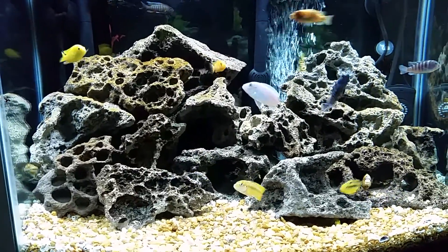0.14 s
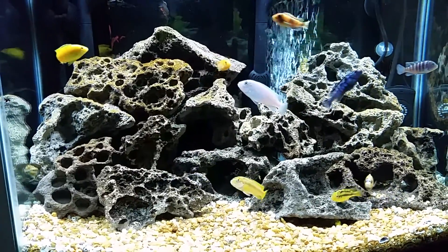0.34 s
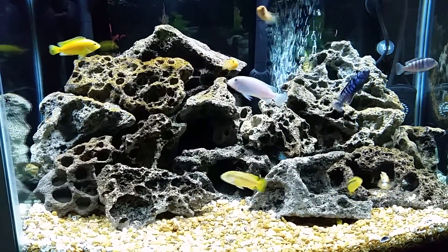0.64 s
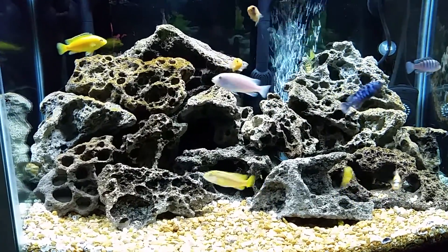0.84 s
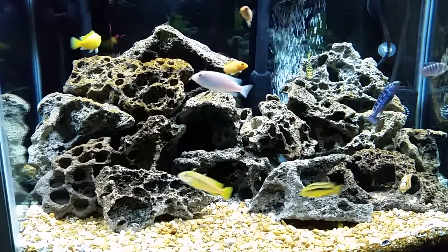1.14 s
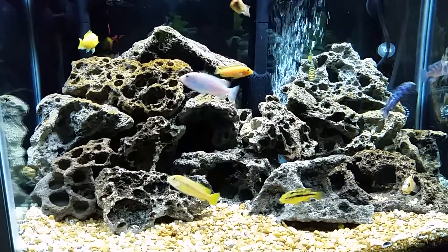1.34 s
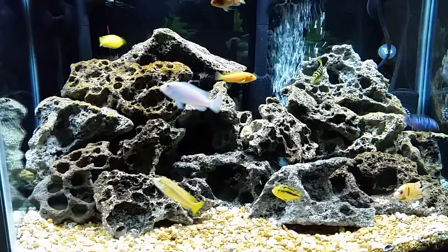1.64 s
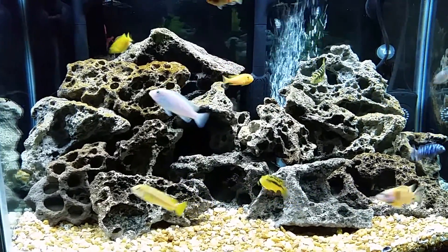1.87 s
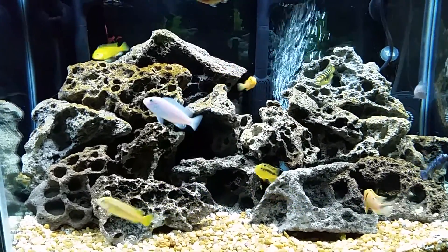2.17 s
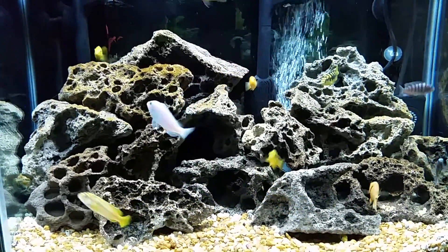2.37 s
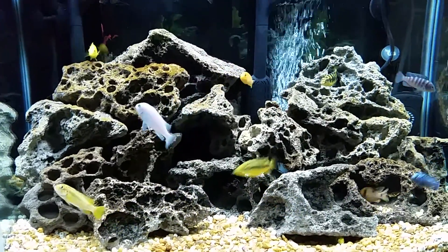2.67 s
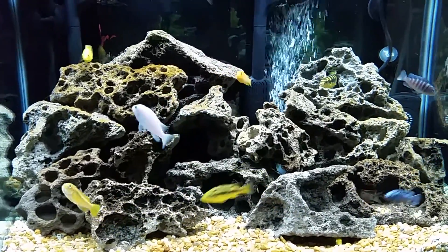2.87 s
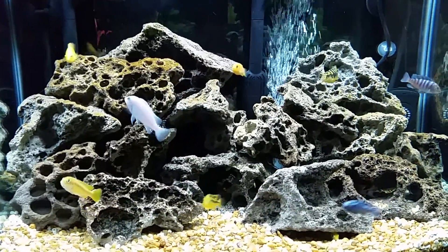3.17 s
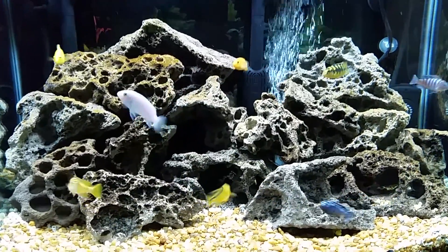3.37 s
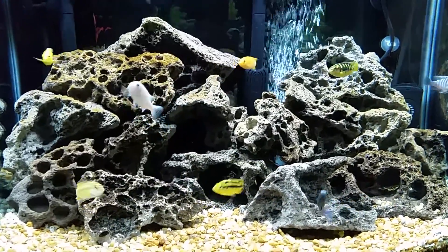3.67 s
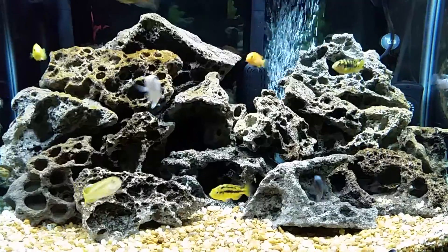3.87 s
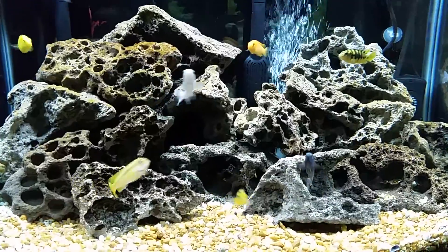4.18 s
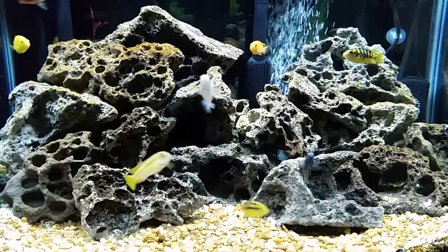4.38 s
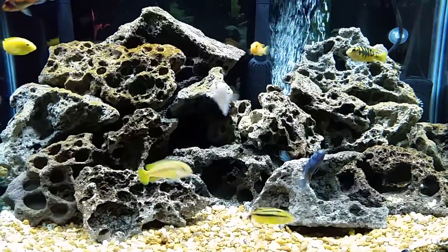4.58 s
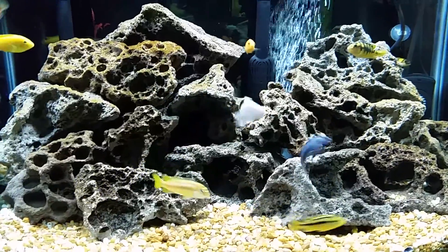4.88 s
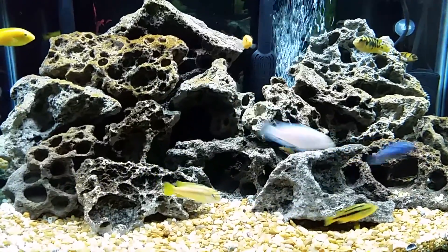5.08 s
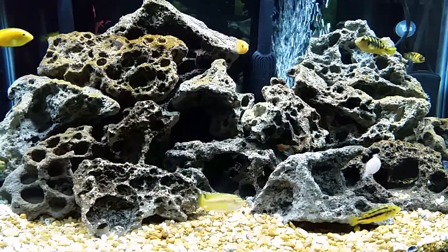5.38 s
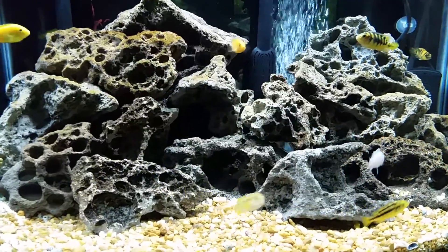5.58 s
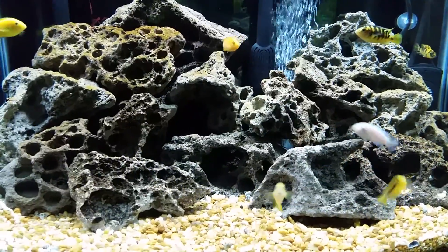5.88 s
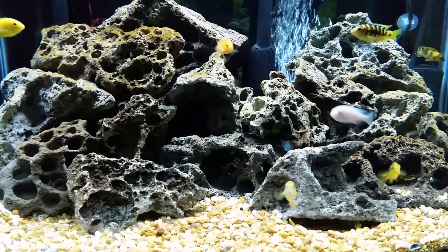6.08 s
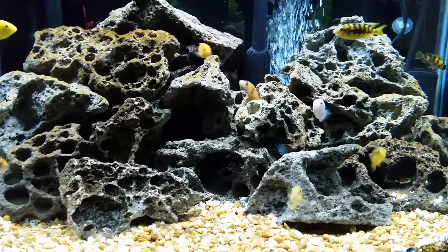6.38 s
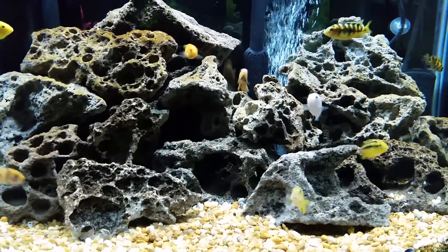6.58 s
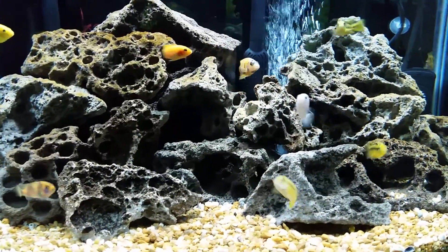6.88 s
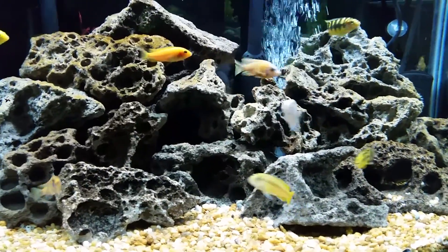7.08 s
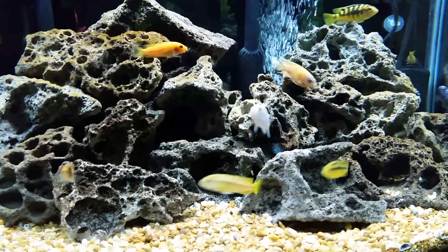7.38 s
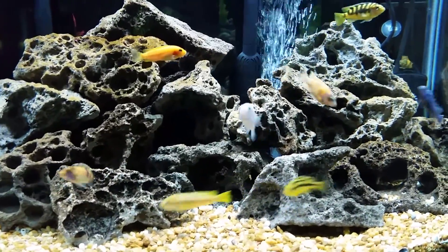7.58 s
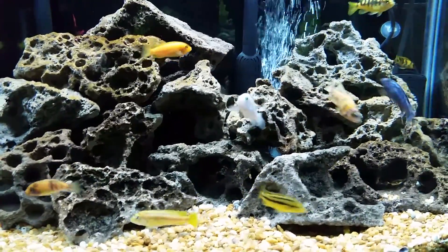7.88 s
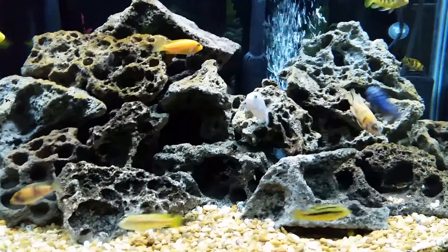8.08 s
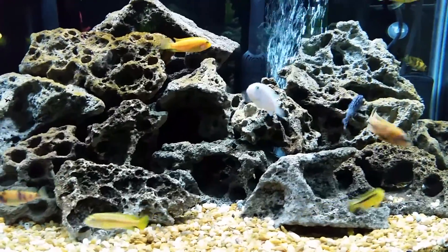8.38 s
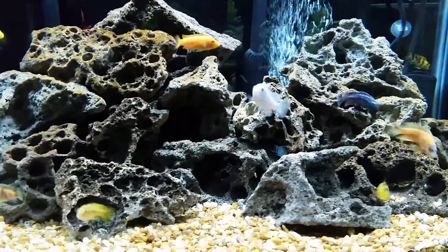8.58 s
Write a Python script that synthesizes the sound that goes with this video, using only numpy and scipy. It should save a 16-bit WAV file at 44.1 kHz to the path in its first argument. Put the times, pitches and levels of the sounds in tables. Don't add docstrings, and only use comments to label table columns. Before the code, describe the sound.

In a quiet room, an aquarium air pump drones with a steady low mains hum while bubbles rumble up through the water, gurgling hollowly and bursting as faint, very high fizz. A thin whistle of air passes at the very start. The handheld microphone takes occasional soft, dull bumps, several clustered past seven seconds, and just after eight seconds its plastic case creaks in rapid ticks and snaps. Hum and bubbling continue to the end.

```python
import sys
import numpy as np
from scipy import signal
from scipy.fft import rfft, irfft
from scipy.io import wavfile

SR = 44100
rng = np.random.default_rng(int(sys.argv[2]) if len(sys.argv) > 2 else 0)


def voltage_ratio(decibels):
    exponent = np.asarray(decibels, float) / 20
    return 10 ** exponent


def dump(signal):
    limited = np.clip(np.atleast_2d(signal).T, -1, 1)
    pcm = np.round(limited * 32767).astype(np.int16)
    wavfile.write(sys.argv[1], SR, pcm)


N = 384993
FIZZ_DB = -62

# start_s, peak_db
POPS = [(0.3072, -47), (0.7009, -49.5), (0.9735, -46.5), (1.6072, -46.5), (2.697, -48.5), (3.5626, -52),
        (3.6448, -49.5), (4.0496, -46.5), (4.5674, -49.5), (5.1849, -45), (5.3951, -45.5), (5.5704, -48),
        (5.9638, -49.5), (6.1459, -50), (6.4726, -47.5), (6.7558, -46), (6.9646, -45), (7.5216, -47.5)]


def rms_one(x):
    return x / np.sqrt(np.mean(x ** 2) + 1e-20)


def colour(points):
    hz, gain_db = np.transpose(points)
    grid = np.arange(N // 2 + 1) * SR / N + 1e-3
    return grid, voltage_ratio(np.interp(np.log(grid), np.log(hz), gain_db, left=-200, right=-200))


def drift(rate_hz):
    r = np.exp(-80 * np.pi * rate_hz / SR)
    noise = rng.standard_normal(N // 40 + 2002)
    slow = signal.lfilter([1], [1, -2 * r, r * r], noise)[2000:]
    return np.interp(np.arange(N) / 40, np.arange(len(slow)), rms_one(slow))


def clicks_at(rows):
    out = np.zeros(N)
    for start_s, peak_db in rows:
        out[round(start_s * SR)] += voltage_ratio(peak_db)
    return out


def pump(wobble_db):
    # mains_multiple, rms_db
    hum_tones = [(1, -43.5), (2, -38.5), (3, -52.5), (4, -57), (6, -55), (7, -67.5), (8, -63), (9, -58.5),
                 (10, -63.5), (11, -73), (12, -68.5), (13, -79.5), (14, -63), (16, -73), (19, -76),
                 (20, -79), (21, -73.5), (23, -78.5)]
    mains_hz, stroke_start_rad = 59.992, 1.18
    cabinet_lag_rad = 0.6
    turn = 2 * np.pi * mains_hz * np.arange(N) / SR + stroke_start_rad
    load = drift(2.3)
    out = np.zeros(N)
    for k, tone_db in hum_tones:
        waver = wobble_db * (load + 0.12 * np.sqrt(k) * drift(6.9))
        if k < 9:
            lag = cabinet_lag_rad * max(k - 2, 0)
        else:
            lag = rng.uniform(0, 2 * np.pi)
        out -= np.sqrt(2) * voltage_ratio(tone_db + waver) * np.sin(k * turn - lag)
    return out


def rumble(level_db, patchy_db):
    # pitch_hz, density_db_per_hz
    stream_colour = [(12, -37), (30, -18.5), (50, -17.5), (90, -12.5), (160, -11.5), (270, -18.5),
                     (430, -16), (640, -20), (950, -26), (1550, -33), (1800, -38.5), (3000, -49.5),
                     (5200, -57), (10500, -85.5)]
    # pitch_hz, width_hz, lift_db
    tank_modes = [(202, 27, 3.5), (318.4, 58, 8.5), (414, 18, -3), (590, 45, 1), (880, 35, 2),
                  (490, 19, 3.5), (544, 31.3, 10), (585.5, 23.8, 11.5), (860, 25, 4.5), (1240, 200, 1.5)]
    hz, gain = colour(stream_colour)
    for centre, width, lift_db in tank_modes:
        gain = gain * voltage_ratio(lift_db / (1 + (2 * (hz - centre) / width) ** 2))
    noise = rfft(rng.standard_normal(N)) * gain
    place = 2 * np.log2(hz / 20)
    shared = drift(4)
    out = np.zeros(N)
    for k in range(19):
        band = np.cos(np.pi / 2 * np.clip(place - k, -1, 1)) ** 2
        depth_db = patchy_db * np.exp(-((k - 9.5) / 3.0) ** 2)
        out += irfft(noise * band, N) * voltage_ratio(depth_db * (0.13 * shared + drift(6.8)))
    audible = signal.sosfilt(signal.butter(4, 250, "high", fs=SR, output="sos"), out)
    return out / np.std(audible) * voltage_ratio(level_db)


def swells():
    # start_s, length_s, fizz_db
    rafts = [(0.252, 0.084, -57.5), (0.755, 0.033, -60), (0.961, 0.034, -58), (1.396, 0.032, -59),
             (2.106, 0.08, -59.5), (2.396, 0.05, -60.5), (4.042, 0.044, -59.5), (4.361, 0.052, -60),
             (5.153, 0.076, -58), (5.349, 0.076, -61), (6.061, 0.032, -61), (6.113, 0.088, -59.5),
             (6.307, 0.038, -60.5), (6.43, 0.114, -59), (6.698, 0.148, -58), (6.915, 0.076, -59),
             (7.025, 0.03, -61.5), (7.201, 0.04, -60.5), (7.899, 0.064, -59)]
    spread_s = 0.012
    pop_swell_db, pop_swell_s = 1.5, 0.012
    t = np.arange(0, N / SR + 0.002, 0.002)
    lifts = []
    for start_s, length_s, raft_db in rafts:
        middle_s = start_s + length_s / 2
        lifts.append((raft_db - FIZZ_DB) * np.exp(-((t - middle_s) / (length_s / 2 + spread_s)) ** 2))
    for start_s, _ in POPS:
        lifts.append(pop_swell_db * np.exp(-((t - start_s) / pop_swell_s) ** 2))
    return np.interp(np.arange(N) / SR, t, FIZZ_DB + np.max(lifts, axis=0))


def fizz(level_db, per_s, spread_db, surge_db):
    # pitch_hz, density_db_per_hz
    burst_colour = [(7000, -72), (9000, -44), (10500, -27.5), (12000, -14), (13300, -6), (14100, 0.5),
                    (15000, 0.5), (16000, -2)]
    gain = colour(burst_colour)[1]
    surge = voltage_ratio(surge_db * (0.4 * drift(5) + drift(22)))
    sizes = voltage_ratio(spread_db * np.minimum(rng.exponential(1, N), 5)) * rng.choice([-1, 1], N)
    grains = rms_one(sizes * (rng.random(N) < per_s / SR))
    mist = rng.standard_normal(N)
    spray = rms_one(irfft(rfft((grains + mist) * surge) * gain, N))
    smear = rng.standard_normal(200) * np.exp(-np.arange(200) / 45.0)
    pops = np.convolve(clicks_at(POPS), smear)[:N] * voltage_ratio(-10.5)
    tick_peak = np.max(np.abs(irfft(gain, N)))
    return spray * voltage_ratio(level_db) + irfft(rfft(pops) * gain, N) / tick_peak


def squeak():
    start_s, attack_s, hold_s, release_s = 0.01, 0.03, 0.11, 0.05
    whistle_hz, level_db, sag_db = 1470, -64, 6
    corners = start_s + np.cumsum([0, attack_s, hold_s, release_s])
    shape = np.interp(np.arange(N) / SR, corners, [0, 1, voltage_ratio(-sag_db), 0])
    pitch_hz = whistle_hz + 4 * drift(20)
    tone = np.sin(2 * np.pi * np.cumsum(pitch_hz) / SR) * voltage_ratio(1.5 * drift(30))
    return np.sqrt(2) * voltage_ratio(level_db) * shape * tone


def bubble(start_s, peak_db, hz, t60_s, rise):
    t = np.arange(min(SR // 5, N - round(start_s * SR))) / SR
    shape = (1 - np.exp(-t / 0.0079)) * voltage_ratio(-60 * t / t60_s)
    tone = np.sin(2 * np.pi * hz * t * (1 + rise * t))
    return voltage_ratio(peak_db) * shape / shape.max() * tone


def faint_gurgles():
    per_s, middle_db, spread_db, range_hz = 2.6, -42.5, 4.5, (500, 620)
    chance = rng.random((60, 3))
    starts_s = np.cumsum(-np.log(chance[:, 0])) / per_s
    rows = []
    for start_s, a, b in zip(starts_s, chance[:, 1], chance[:, 2]):
        if start_s < N / SR:
            rows.append((start_s, middle_db + spread_db * (2 * a - 1), np.interp(b, [0, 1], range_hz)))
    return rows


def glugs():
    # start_s, peak_db, pitch_hz, ring_t60_s
    large_bubbles = [
        (5.97, -53, 1335, .05),
        (6.015, -56, 1280, .05),
        (5.76, -49, 840, .08),
        (6.415, -43, 850, .06),
        (6.415, -53, 1335, .05),
    ]
    # peak_s, peak_db, pitch_hz
    loud_gurgles = [(0.039, -47, 541), (0.16, -36.5, 544), (0.222, -45, 504), (0.598, -40, 505),
                    (0.723, -43, 581), (0.874, -32.5, 580), (1.024, -36, 542), (1.657, -38, 574),
                    (1.835, -35, 565), (2.038, -42, 556), (2.695, -38, 537), (3.024, -39, 582),
                    (3.231, -40, 506), (3.591, -43, 524), (4.043, -44, 540), (4.642, -35.5, 546),
                    (4.77, -36.5, 562), (5.71, -39, 584), (5.827, -43, 560), (5.944, -36, 576),
                    (6.655, -37, 539), (6.928, -36, 585), (7.446, -41, 600), (8.561, -43, 574)]
    rings = list(large_bubbles)
    for peak_s, peak_db, hz in list(loud_gurgles) + faint_gurgles():
        rings.append((max(peak_s - 0.006, 0), peak_db - 4.5, hz, 0.09))
    out = np.zeros(N)
    for start_s, peak_db, hz, t60_s in rings:
        one = bubble(start_s, peak_db, hz, t60_s, rise=0.44)
        first = round(start_s * SR)
        out[first:first + len(one)] += one
    return out


def hiss(level_db):
    return voltage_ratio(level_db) * rng.standard_normal(N)


def bumps(cycles, skew, edge):
    # middle_s, peak_db, pitch_hz, direction (+1 or -1)
    knocks = [(2.256, -36, 149, 1), (2.266, -21.5, 137, 1), (4.347, -30, 105, 1), (4.376, -31, 111, 1),
              (5.2637, -24.5, 150, 1), (5.272, -35, 152, 1), (6.709, -33, 105, -1), (7.256, -25, 104, 1),
              (7.314, -26, 105, 1), (7.368, -30.5, 106, 1), (7.432, -28, 99, 1), (7.490, -26.5, 115, 1),
              (7.718, -27, 108, 1), (7.789, -35, 100, 1)]
    out = np.zeros(N)
    t = np.arange(-1500, 1500) / SR
    for middle_s, peak_db, hz, way in knocks:
        swing = np.exp(-(hz * t / cycles - skew) ** 2) * np.cos(2 * np.pi * hz * t)
        crest = edge * np.exp(-(hz * t / 0.1) ** 2)
        middle = round(middle_s * SR)
        out[middle - 1500:middle + 1500] += way * voltage_ratio(peak_db) * (swing + crest)
    vent = signal.butter(2, 45, "high", fs=SR, output="sos")
    return signal.sosfiltfilt(vent, out)


def chatter(until_s):
    from_s, gap_s, first_db, growth_db_per_s = 8.0225, 0.0021, -38, 230
    s = np.arange(from_s, until_s - gap_s, gap_s)
    chance = rng.standard_normal((len(s), 2))
    slip_db = first_db + growth_db_per_s * (s - s[0]) + 2.7 * chance[:, 1]
    return zip(s + 0.55 * gap_s * chance[:, 0], slip_db)


def creak():
    # start_s, peak_db
    main_slips = [(8.0103, -34.5), (8.0258, -35.5), (8.0297, -33.5), (8.0327, -28.5), (8.0362, -28),
                  (8.0398, -28), (8.044, -26.5), (8.0451, -29), (8.048, -27), (8.0509, -26), (8.053, -19),
                  (8.0549, -22)]
    # pitch_hz, gain_db
    case_colour = [(200, -14), (600, -8), (1500, -15), (3000, -37), (6500, -49), (8500, -65),
                   (11000, -29.5), (13000, -12), (14500, -0.5), (16000, -1)]
    snap_s, snap_db = 8.0547, -16.5
    slips = clicks_at(main_slips) + clicks_at(chatter(snap_s))
    ragged = np.convolve(slips, np.exp(-np.arange(60) / 25.0))[:N] * rng.standard_normal(N)
    bursts = slips * rng.choice([-1, 1], N) + 0.14 * ragged
    ticks = irfft(rfft(bursts) * colour(case_colour)[1], N) * voltage_ratio(21)

    t = np.arange(N) / SR - snap_s
    rise = np.exp(np.minimum(t, 0) / 0.0004) * (t < 0)
    after = np.maximum(t, 0)
    back = 1.9 * np.exp(-after / 0.0001) - 0.9 * np.exp(-after / 0.002)
    soft = signal.butter(3, 2100, fs=SR, output="sos")
    snap = voltage_ratio(snap_db) * signal.sosfiltfilt(soft, rise + back * (t >= 0))
    sharp = signal.butter(3, [2000, 7000], "band", fs=SR, output="sos")
    crack = voltage_ratio(-44) * signal.sosfilt(sharp, rng.standard_normal(N) * np.exp(-(t / 0.0006) ** 2))
    return ticks + crack + snap


def scene():
    water = rumble(level_db=-47.5, patchy_db=1.14)
    water = water + fizz(swells(), per_s=1300, spread_db=-1.0, surge_db=0.8)
    handling = bumps(cycles=0.42, skew=0.45, edge=0.55) + creak()
    mix = pump(wobble_db=0.7) + water + squeak() + glugs() + hiss(level_db=-97.0) + handling
    return mix[None]


def low_pass(x):
    return signal.sosfilt(signal.butter(12, 16480, fs=SR, output="sos"), x)


def record(dry):
    opening = np.clip(0.3 + np.arange(N) / SR / 0.003, 0, 1)
    opened = (dry - 0.0006) * opening
    below_top = np.arange(N // 2 + 1) * SR / N < 15810
    return low_pass(irfft(rfft(opened) * below_top, N))


dry = scene()
out = record(dry)
dump(out)
```